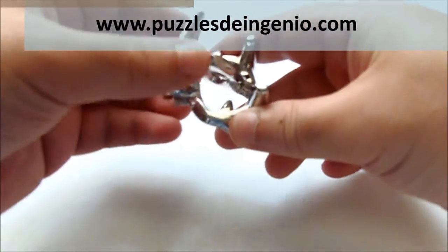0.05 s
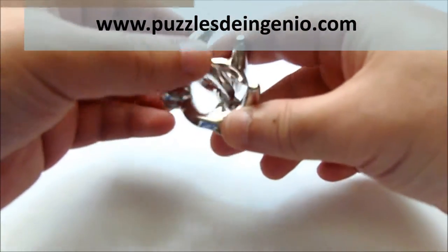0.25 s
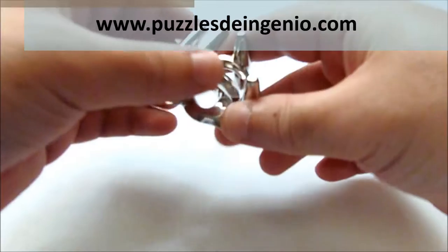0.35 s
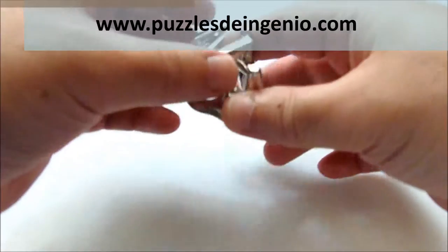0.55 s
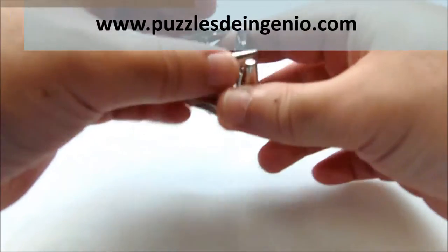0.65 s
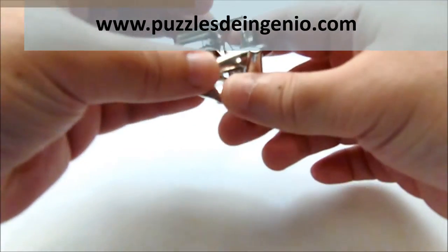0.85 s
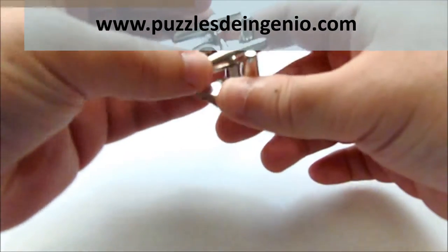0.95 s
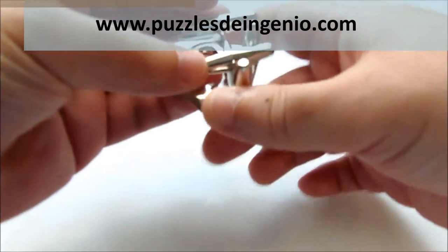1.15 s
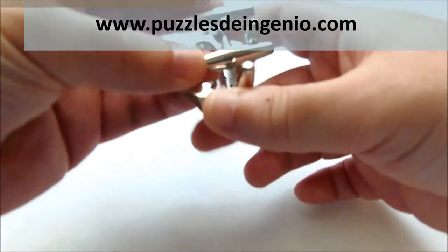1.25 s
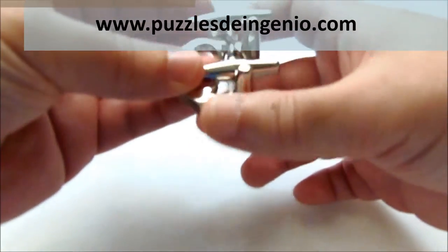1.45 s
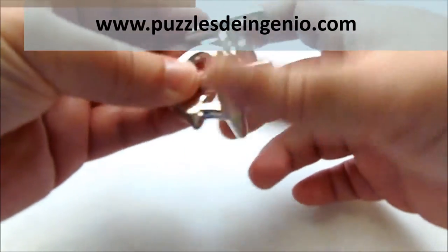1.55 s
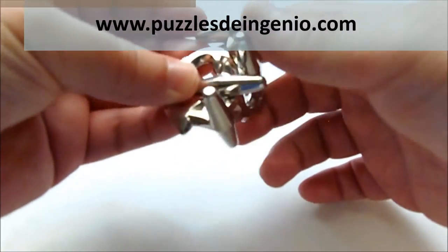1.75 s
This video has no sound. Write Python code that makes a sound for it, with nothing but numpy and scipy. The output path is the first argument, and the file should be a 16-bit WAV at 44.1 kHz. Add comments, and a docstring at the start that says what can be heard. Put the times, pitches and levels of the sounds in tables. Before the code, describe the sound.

Two small metal puzzle pieces clink together as hands turn them, giving irregular bright ticks with a very short ring and a few tiny scrapes. They are heard close up in a quiet room, over faint rumble and hiss.

```python
"""A quiet room, close up: two small cast-metal puzzle pieces are turned in the hands.
They knock, chatter and slide on each other. Each knock is a crack that rings the same six modes
in its own mix, shorter when the fingers grip harder; each slide is a train of tiny slips.
A short room tail follows, over low rumble, hiss and the faint rub of the fingers."""
import sys
import numpy as np
from scipy import signal
from scipy.fft import rfft, irfft, next_fast_len
from scipy.io import wavfile
from scipy.ndimage import map_coordinates

SR = 44100
rng = np.random.default_rng(int(sys.argv[2]) if len(sys.argv) > 2 else 0)


def bounce(signal):
    """Save signal as a 16-bit WAV file at the path given by the first command-line argument."""
    frames = np.transpose(np.atleast_2d(signal))
    limited = np.clip(frames, -1, 1)
    pcm = np.round(limited * 32767).astype(np.int16)
    wavfile.write(sys.argv[1], SR, pcm)


N = 79380
T = np.arange(N) / SR

# Ring of the metal (pitch [Hz], t60 [s], second piece's detune [Hz], relative level when rubbed [dB])
METAL_MODES = [(3710, 0.074, 93, -16.5), (4394, 0.024, 101.5, -10), (5210, 0.06, 120, -1.5),
               (9583, .054, -66.5, 3.5), (10883, .07, 60, -3.5), (13370, .046, -76.5, 2)]
# EQ of a contact's body, the crack (frequency [Hz], gain [dB])
CRACK_EQ = [(300, -37), (900, -18), (1350, -12.5), (1800, -22.5), (2400, -6.5), (2900, -15.5), (3600, 0.5),
            (4500, -8.5), (5600, -3), (7200, -0.5), (7850, -12), (8500, 0.5), (9400, 0), (12000, -9.5)]
# EQ of its bright edge, the bite (frequency [Hz], gain [dB])
BITE_EQ = [(1000, -54), (7900, -33), (8700, -7), (9400, 9.5), (10300, 3.5), (11200, 4.5), (12200, 11.5),
           (13400, 5.5), (14500, -19), (15600, 7)]
# Knock cues (time [s], looseness [1 = loose, lower = gripped], crack send [dB], bite send [dB],
# then the level of each of the six modes [dB])
KNOCK_CUES = [(0.0746, 0.51, -59, -65, -48.5, -70, -55.5, -47.5, -56, -49),
              (0.2016, 1.12, -32, -31, -34, -75, -44, -21, -26, -13),
              (0.2382, 0.67, -51, -56, -50, -71, -44, -55, -32.5, -53),
              (0.362, 1.36, -61.5, -48.5, -57.5, -86, -63, -54, -54, -38.5),
              (0.4572, 0.74, -47, -36, -44, -58, -41, -28.5, -44, -32),
              (0.4665, 1.13, -45, -44, -44.5, -61, -46, -34, -32.5, -25),
              (0.5889, 0.94, -41, -35, -37.5, -48, -33.5, -32.5, -26, -24.5),
              (0.636, 0.96, -72, -58, -52.5, -73, -60, -43, -49, -43),
              (0.649, 0.98, -69, -56, -66, -73, -60, -42.5, -48, -48),
              (0.7329, 1.18, -48, -50, -52, -81, -51, -28.5, -37, -35.5),
              (0.7755, 1.18, -41.5, -28, -57, -76, -43, -15, -33, -21),
              (0.798, 0.44, -57, -47, -47.5, -54, -57, -33, -38, -36),
              (0.827, 1.08, -74, -66, -52, -59, -56, -63, -55, -46),
              (0.8946, 1.29, -55, -48, -57, -70, -48, -37.5, -53, -47),
              (0.9016, 0.78, -60, -53, -55, -72, -52.5, -34, -58, -42),
              (0.96, 0.58, -75, -64, -53, -62, -55, -60, -70, -48),
              (0.9732, 0.82, -55, -63, -58.5, -55, -71, -51, -73, -56),
              (0.9985, 0.71, -47.5, -41, -50, -48.5, -44.5, -45.5, -40.5, -35),
              (1.2225, 0.55, -39.5, -33.5, -44, -33, -32, -26, -32.5, -29),
              (1.351, 0.86, -74, -53.5, -48.5, -68, -42.5, -67, -74, -50),
              (1.373, 0.89, -36, -33, -42, -37.5, -42, -35, -26.5, -52),
              (1.398, 0.38, -45, -50, -52, -50, -35, -36.5, -34, -44),
              (1.479, 0.92, -50, -56, -45.5, -47, -40, -66, -51, -44.5),
              (1.5321, 0.85, -39, -40, -39.5, -59, -26, -27.5, -28, -29),
              (1.602, 0.66, -43.5, -57, -45, -49.5, -37, -60, -32.5, -59),
              (1.6158, 0.34, -57, -63, -52, -54, -48, -63, -62, -54)]


def knocks():
    """A crack rings the paired modes of the two pieces; the grip damps, stiffens and roughens them."""
    crack_t60_s, scatter_t60_s = 0.0042, 0.06  # the contact; its scatter off hands and table
    attack_s, hold_s = 0.00022, 0.0055
    stiffen_hz, pitch_spread_hz, twin_db = 175, 21, -11.5
    out, t = np.zeros(N), T[:SR // 6]
    for start, loose, crack_db, bite_db, *mode_levels in KNOCK_CUES:
        burst = fade(t, crack_t60_s) + amp(-3) * fade(t, scatter_t60_s * np.sqrt(loose))
        sound = amp(crack_db + 9) * coloured(burst * rng.standard_normal(len(t)), CRACK_EQ)
        sound += amp(bite_db + 7) * coloured(burst * rng.standard_normal(len(t)), BITE_EQ)
        buzz_depth = 0.55 / loose ** 2 * fade(t, t60=0.22)
        for (hz, t60, detune_hz, _), db in zip(METAL_MODES, mode_levels):
            phase, twin_phase = rng.uniform(0, 2 * np.pi, 2)
            hz = hz + stiffen_hz * (1 - loose) ** 2 + pitch_spread_hz * rng.standard_normal() / loose
            tone = np.exp(1j * (2 * np.pi * hz * t + phase))
            beat = 1 + amp(twin_db) * np.exp(1j * (2 * np.pi * detune_hz * t + twin_phase))
            ring = np.real((beat + buzz_depth * chatter(t)) * tone) / np.sqrt(1 + buzz_depth ** 2 / 2)
            attack = 1 - np.exp(-t / attack_s)
            decay = fade(np.maximum(t - hold_s, 0), t60 * loose ** 1.65)
            sound += np.sqrt(2) * amp(db) * attack * decay * ring
        add(out, start, sound)
    return out


def chatter(t, knots_per_s=640):
    """Touching pieces buzz: a fast random wander of the ring's strength and phase."""
    knots = rng.standard_normal((2, len(t)))
    real, imag = (map_coordinates(row, [t * knots_per_s], order=1) for row in knots)
    return (real + 1j * imag) / np.sqrt(2)


# Slide cues, metal on metal (time [s], length [s], send level [dB])
SLIDE_CUES = [(0.463, 0.035, -35), (0.494, 0.063, -56), (0.611, 0.045, -43), (0.791, 0.0082, -38),
              (0.812, 0.0054, -42), (0.966, 0.018, -62), (1.328, .034, -53.5), (1.376, .012, -32.5),
              (1.596, 0.0057, -34.5), (1.6197, 0.0016, -51)]


def slides(slips_per_s=4700):
    """Tiny random slips make grit and a soft ring of the same modes."""
    slips, t = np.zeros(N), T[:SR // 4]
    for start, length, db in SLIDE_CUES:
        slipping = rng.random(len(t)) < slips_per_s / SR
        grains = unit(slipping * rng.standard_normal(len(t)))
        stroke = arch(length)
        add(slips, start, amp(db) * stroke * grains[:len(stroke)])
    modes = sum(amp(db) * fade(t, t60) * np.sin(2 * np.pi * hz * t) for hz, t60, _, db in METAL_MODES)
    ring = signal.fftconvolve(slips, modes / np.linalg.norm(modes))[:N]
    grit = coloured(slips, CRACK_EQ) + coloured(slips, BITE_EQ)
    return amp(-2) * ring + amp(-7) * grit


# Reverb time of the room (frequency [Hz], t60 [s])
ROOM_DECAY = [(500, .35), (4000, .3), (10000, 0.13), (15000, 0.11)]


def room_tail(x, predelay_s=0.0098):
    """The room returns a short diffuse tail whose treble dies first."""
    hz, t, spectrum = signal.stft(rng.standard_normal(SR // 2), SR, nperseg=256)
    tail = signal.istft(spectrum * fade(t, along(ROOM_DECAY, hz)[:, None]), SR)[1]
    out = np.zeros(N)
    add(out, predelay_s, signal.fftconvolve(x, tail / np.linalg.norm(tail)))
    return out


# Fader ride of the finger rub (time [s], level before trim [dB])
RUB_RIDE = [(0.0, -42), (0.65, -52.5), (0.832, -49), (1.072, -89), (1.278, -50.5), (1.504, -45.5),
            (1.8, -44.5)]
# Fingers shift their hold (time [s], length [s], level [dB])
REGRIP_CUES = [(1.728, 0.017, -57), (1.739, 0.033, -65)]
# EQ of rubbing skin (frequency [Hz], gain [dB])
SKIN_EQ = [(150, 11.5), (500, -2), (1300, -4.5), (3000, -14.5), (8000, -19), (16000, -14)]


def fingers(trim_db=-5):
    """Skin rubs on the metal: dull noise that swells briefly as the hold shifts."""
    level = amp(trim_db + np.interp(T, *np.transpose(RUB_RIDE)))
    for start, length, db in REGRIP_CUES:
        add(level, start, amp(db) * arch(length))
    return level * unit(coloured(rng.standard_normal(N), SKIN_EQ))


# EQ of the room's rumble and hiss (frequency [Hz], gain [dB])
ROOM_TONE_EQ = [(15, -34), (25, 9), (217, 1.5), (754, -13), (818, -14.5), (936, -14.5), (1560, -21),
                (2160, -20), (2610, -25.5), (3080, -15), (3520, -28.5), (4870, -22.5), (8830, -34.5),
                (9570, -32), (16000, -33)]


def room_tone(level_db=-48):
    """A steady bed of low rumble and faint hiss."""
    return amp(level_db) * unit(coloured(rng.standard_normal(N), ROOM_TONE_EQ))


def amp(db):
    """Decibels to gain."""
    return 10 ** (np.asarray(db) / 20)


def unit(x):
    """Scale to rms 1."""
    return x / np.sqrt(np.mean(x ** 2) + 1e-20)


def along(points, hz):
    """Read (Hz, value) points on a log frequency axis."""
    freqs, values = np.transpose(points)
    return np.interp(np.log(hz + 1), np.log(freqs + 1), values)


def fade(t, t60):
    """Exponential decay, 60 dB down after t60."""
    return np.exp(-np.log(1000) * t / t60)


def arch(length):
    """A swell that rises and falls over the given seconds."""
    return np.sqrt(np.hanning(max(round(length * SR), 4)))


def coloured(x, eq):
    """Causal EQ with the given (Hz, dB) shape and unit power gain."""
    size = 2 * next_fast_len(len(x))
    gain = unit(amp(along(eq, np.fft.rfftfreq(size, 1 / SR))))
    cepstrum = irfft(np.log(gain), size)
    cepstrum[1:size // 2] *= 2  # fold to minimum phase: no ringing ahead of a hit
    cepstrum[size // 2 + 1:] = 0
    return irfft(rfft(x, size) * np.exp(rfft(cepstrum)), size)[:len(x)]


def add(track, start, sound):
    """Mix a sound into the track at start seconds."""
    part = track[max(round(start * SR), 0):][:len(sound)]
    part += sound[:len(part)]


def scene():
    """Mono mix: the metal up front, its room tail, room tone and fingers behind."""
    metal = knocks() + slides()
    return (metal + amp(-20) * room_tail(metal) + room_tone() + fingers())[None]


def record(dry):
    """A steep high cut takes off the very top."""
    size, cutoff_hz = next_fast_len(N + SR // 4), 15750
    high_cut = 1 / (1 + (np.fft.rfftfreq(size, 1 / SR) / cutoff_hz) ** 120)
    return irfft(rfft(dry, size) * high_cut, size)[..., :N]


dry = scene()
out = record(dry)
bounce(out)
```